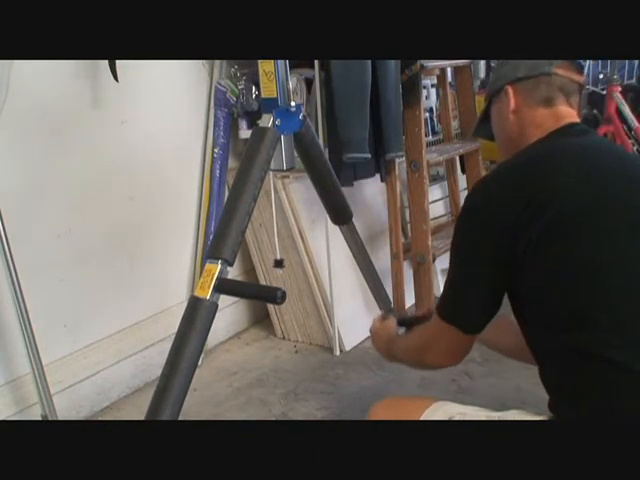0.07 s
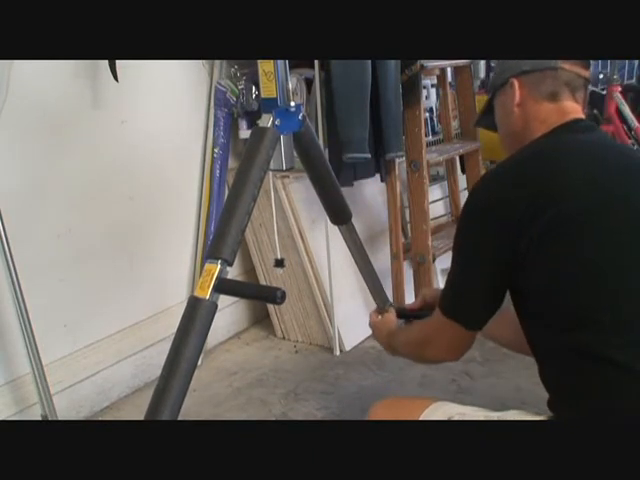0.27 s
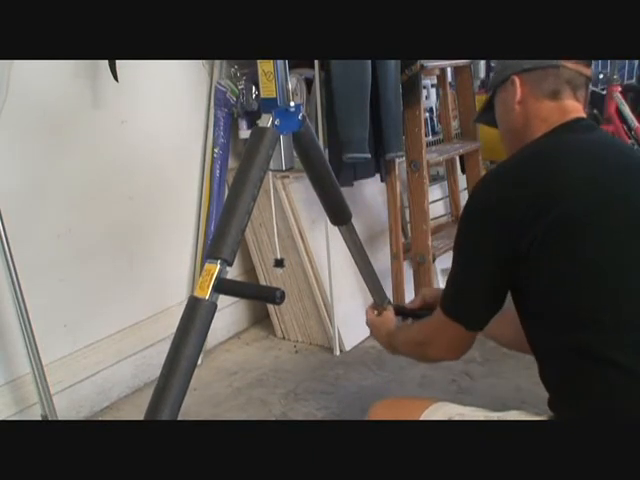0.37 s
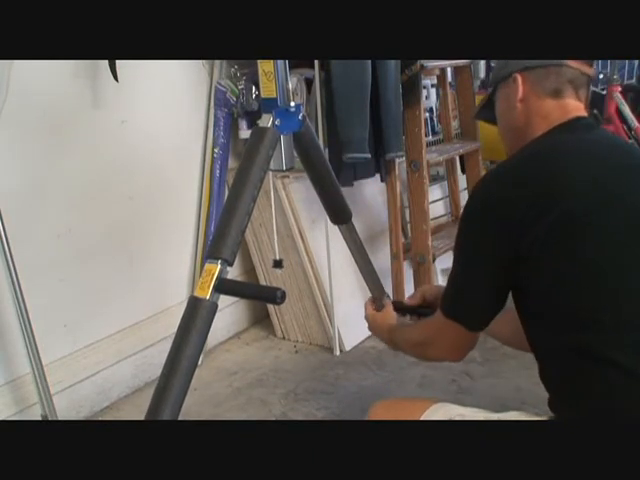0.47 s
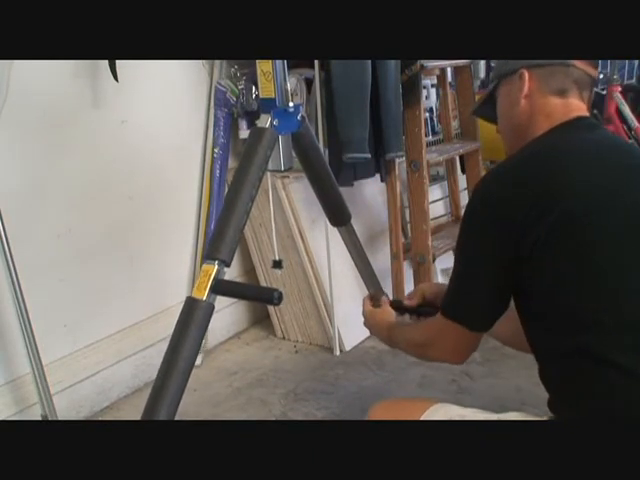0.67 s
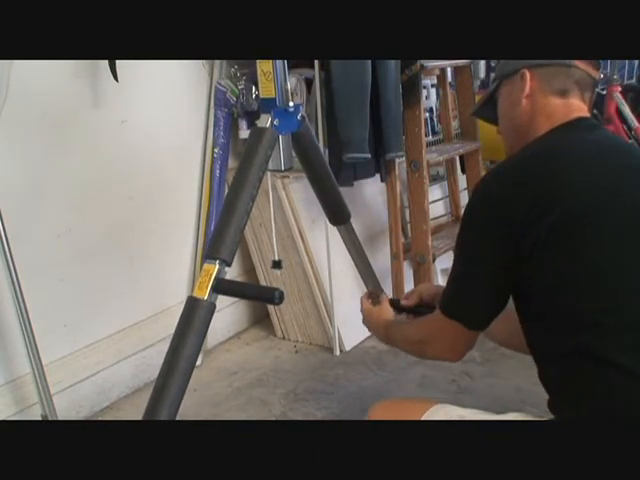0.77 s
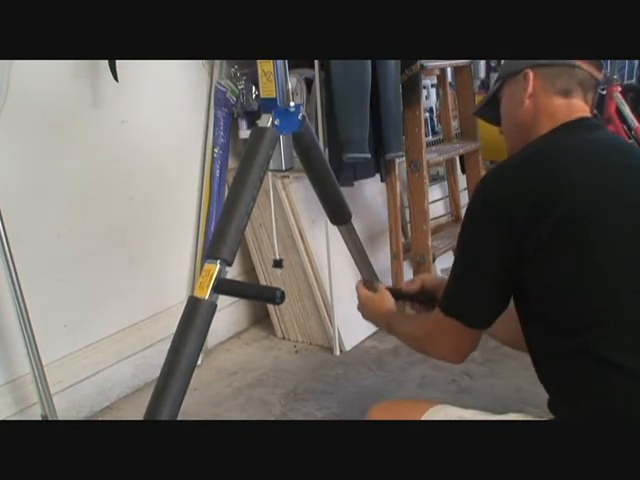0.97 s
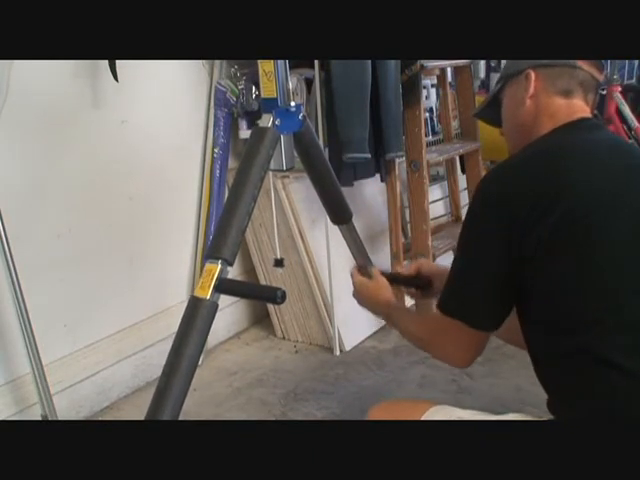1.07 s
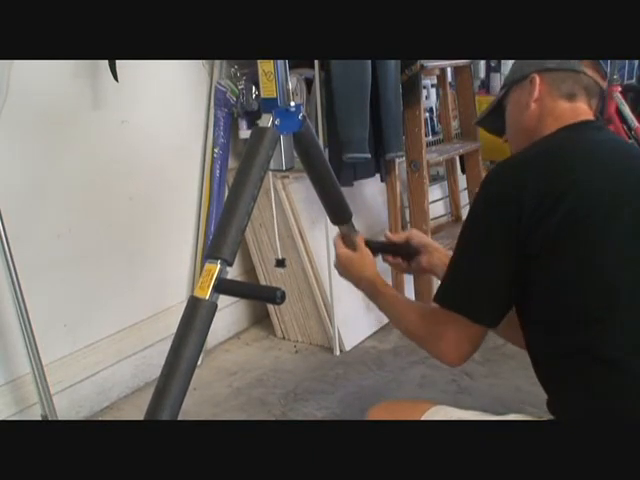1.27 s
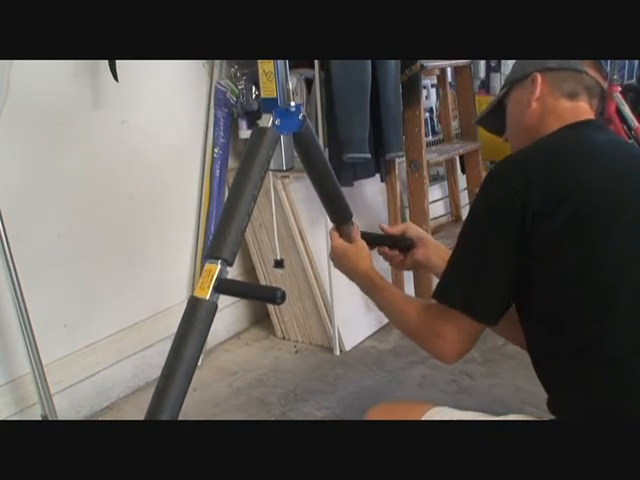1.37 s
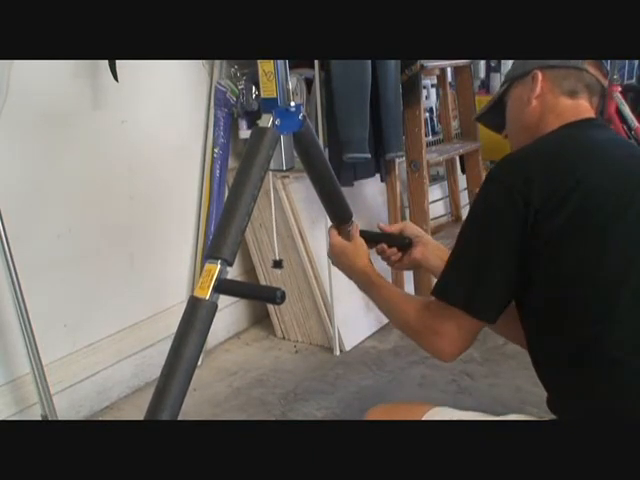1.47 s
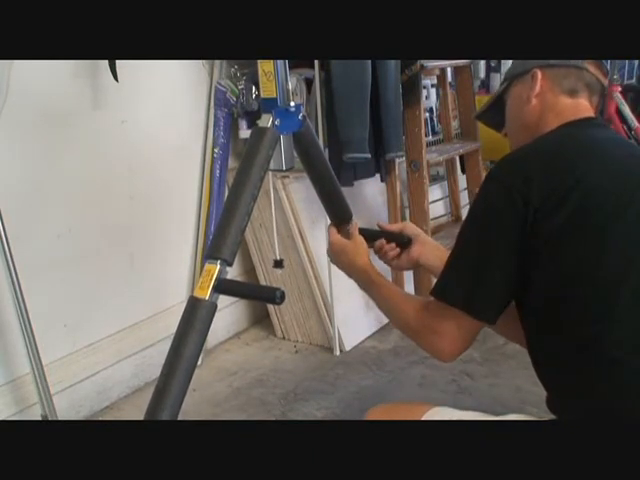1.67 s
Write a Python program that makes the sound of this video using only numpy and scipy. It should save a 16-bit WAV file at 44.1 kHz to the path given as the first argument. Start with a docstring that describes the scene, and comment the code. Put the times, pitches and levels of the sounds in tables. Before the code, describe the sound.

A foam-sleeved metal peg clacks brightly against a hollow tube, then clunks home with a short ring; dry foam rubbing follows in uneven strokes with small squeaks, picked up in stereo in a bare, echoing garage.

```python
"""Under a low garage hum, a foam-sleeved peg clacks against the tube of a metal stand at 0.2 s.
The sleeve begins to rub, catching and slipping; at 0.5 s the peg clunks home, and the strokes go on to 1.6 s.
Knocks are decaying noise through the tube's modes; sine notes ring on, and low ones swell from stand and room.
Rubbing and catches are dense random grains through the same modes; narrow noise makes the squeaks.
Knocks, catches and rubbing are answered by the bare room, built from decaying stereo noise."""
import sys
import numpy as np
from scipy import signal
from scipy.fft import rfft, irfft, next_fast_len
from scipy.io import wavfile
from scipy.ndimage import map_coordinates

SR = 44100
rng = np.random.default_rng(int(sys.argv[2]) if len(sys.argv) > 2 else 0)


def transcribe(signal):
    """Save signal, clipped to [-1, 1], as a 16-bit WAV file at the path in sys.argv[1]."""
    frames = np.atleast_2d(signal).T
    limited = np.clip(frames, -1, 1)
    pcm = np.round(limited * 32767).astype(np.int16)
    wavfile.write(sys.argv[1], SR, pcm)


N = 74970

# Hum and hiss of the garage. Each row: frequency in Hz, relative density in dB per Hz.
FLOOR_SPECTRUM = [(20, -26), (40, -21), (58, 6), (72, -13), (86, -1), (115, -9), (160, -6.5), (260, -21),
                  (500, -23), (1000, -24.5), (2000, -27.5), (4000, -33.5), (8000, -43), (12000, -40),
                  (16000, -41)]
FLOOR_DB, FLOOR_SIDE_DB = -56, -16  # the side is relative to the mid

# Decay of the room's tail. Each row: frequency in Hz, t60 in seconds.
GARAGE_DECAY = [(100, 1), (400, 0.66), (1100, 0.47), (3000, 0.5), (6000, 0.46), (14000, 0.36)]
# Gain of the room's left-right difference. Each row: frequency in Hz, gain in dB.
ROOM_WIDTH = [(100, -16.5), (1000, -10), (4000, -10), (8000, -8.5), (10500, -1.5), (12500, -36)]
ROOM_DB, EARLY_DB, EARLY_T60_S, ROOM_BUILD_S = -1, -3, 0.079, 0.0059
# Direct sound on the same scale as the two room levels.
KNOCK_DIRECT_DB, CATCH_DIRECT_DB, SQUEAK_DIRECT_DB, RUB_DIRECT_DB = -2, -7, 6, -3.5

# Modes of the metal tube. Each row: frequency in Hz, width in Hz, relative level in dB.
TUBE_MODES = [(348, 38, -10), (563.3, 10, 10.5), (1060, 200, -4.5), (1806, 175, 3), (2277, 53, 4),
              (3235, 98, 6.5), (3414, 74, 9), (4016, 76, 6.5), (4935, 36, 8.5), (5080, 180, 0),
              (5200, 32, -2), (5870, 14, -2), (6100, 68, -13), (7530, 190, 3.5)]
# Low notes of the stand and the room. Each row: start in seconds, level in dB, frequency in Hz,
# t60 in seconds.
LOW_NOTES = [(0.22, -39, 361, 0.4), (0.512, -28.5, 437.5, 0.5), (0.58, -44.5, 81.2, 0.86),
             (0.53, -40, 265.5, 0.92), (0.59, -38.5, 201.2, 0.34), (0.809, -42, 206, 0.7)]
# Long notes of the metal. Each row: frequency in Hz, level after the clack in dB,
# level after the clunk in dB, t60 in seconds.
RINGING_NOTES = [(1126, -40, -64, 0.22), (1330, -65, -28, 0.16), (1441, -59, -27.5, 0.19),
                 (2250, -32, -60, .33), (4868, -33.5, -66, 0.46), (5670, -64, -39.5, 0.6),
                 (5810, -61, -31, 0.22)]

CLACK_S, CLUNK_S = 0.2121, 0.5
# First hard touch of the clack. Each row: level in dB, frequency in Hz, rise in seconds, t60 in seconds.
TOCK_PARTIALS = [(-6, 1850, .0008, .010), (-13, 1250, .0008, .012), (-15, 2650, .0008, .014)]
# The two blows of the peg. Each holds: relative level in dB, contact t60 in seconds,
# rattle level against the contact in dB, rattle t60 in seconds, tube ring in dB.
CLACK_BLOW = (-5.5, 0.2, -26, 1, 0)
CLUNK_BLOW = (-5.5, 0.05, -23, 0.1, -21)
# Colour of each contact. Each row: frequency in Hz, relative level in dB per Hz.
CLACK_SPECTRUM = [(100, -23), (260, -10.5), (370, 1.5), (600, -7.5), (720, -8.5), (1050, 3.5), (1400, -7.5),
                  (2200, -0.5), (3200, -12), (4000, -19), (5200, -9), (7500, -20), (8800, -25.5),
                  (12500, -23), (16000, -25)]
CLUNK_SPECTRUM = [(100, -12.5), (250, -3.5), (440, 1.5), (650, -7), (1000, 1.5), (1350, -1.5), (1800, -7),
                  (2700, -15.5), (4600, -19.5), (5900, -12.5), (8000, -19.5), (10000, -31), (12000, -24.5),
                  (16000, -40)]

# The sleeve catches and slips. Each row: start in seconds, relative level in dB, squeak in Hz,
# squeak level in dB, bass tilt in dB, treble tilt in dB, time scale of the catch in seconds.
SLEEVE_CATCHES = [(0.366, -19.5, 1790, -12, -12, -28, 0.033), (0.636, -18.5, 3250, -2.5, 1, -9.5, 0.011),
                  (0.778, -22.5, 1470, -0.5, 13, -2, 0.021), (0.799, -13.5, 1800, -5.5, 7, -6, 0.015),
                  (0.9345, -11.5, 3200, -4, -4, 0.5, 0.0072), (0.941, -16.5, 8120, -4.5, 3, 13, 0.0082),
                  (1.0117, -9.5, 3380, -4, -2, -3, 0.015), (1.078, -14, 2750, -4.5, -3, -8, 0.0097),
                  (1.183, -22.5, 1760, -16, -22, -11, .008), (1.204, -13.5, 1940, -0.5, -21, -4.5, 0.0098),
                  (1.366, -22, 1130, 4, -5.5, 6.5, 0.0055), (1.427, -21, 1690, -25, 18, -7, 0.0096)]
# Colour of the catch scrapes. Each row: frequency in Hz, gain in dB.
SCRAPE_SPECTRUM = [(150, -19), (400, -13), (700, -4), (1100, -4), (2200, -0.5), (2900, -5.5), (4400, -5.5),
                   (6200, -3), (8500, -13), (10500, -15.5), (12500, -17), (16000, -40)]
SQUEAK_WIDTH_HZ = 410  # of each of two equal resonances in a row

# Rubbing effort over time. Each row: time in seconds, level in dB.
RUB_EFFORT = [(0.3, -64), (0.37, -43.5), (0.45, -41), (0.5, -44.5), (0.58, -38), (0.66, -46.5), (0.72, -76),
              (0.77, -47), (0.81, -34.5), (0.86, -50.5), (0.925, -64), (0.96, -40.5), (1.06, -42.5),
              (1.1, -34), (1.18, -39), (1.26, -34.5), (1.34, -39), (1.44, -36), (1.52, -46), (1.6, -58.5),
              (1.7, -58)]
# Movement of the rubbing's hiss against its body. Each row: time in seconds, offset in dB.
HISS_MOVEMENT = [(0.36, -4), (0.44, 3.5), (0.6, 0.5), (0.8, 1.5), (0.97, 1.5), (1.12, 4.5), (1.28, 3),
                 (1.45, -2), (1.62, -5)]
HISS_DB = -4  # added to the movement
# Colour of the rubbing's body and of its hiss. Each row: frequency in Hz, gain in dB.
BODY_SPECTRUM = [(80, -25.5), (200, -3), (380, 1), (680, -8), (1100, 4), (1500, -4), (1900, -4.5),
                 (2700, -14.5), (4500, -22.5), (16000, -36)]
HISS_SPECTRUM = [(800, -55), (2300, -16.5), (3300, -1.5), (4300, -5.5), (5300, -0.5), (7000, -7.5),
                 (10000, -10), (12500, -10.5), (16000, -20)]
GRAINS_PER_S, GRAIN_SPREAD_DB = 2000, 4.5

# Left level over right level. Each row: frequency in Hz, difference in dB.
STEREO_BALANCE = [(60, -2), (250, -2.3), (500, 0), (1000, 1), (8000, 1), (12000, 0)]
TOP_HZ = 15780


def amp(db):
    """Decibels to gain."""
    return 10 ** (np.asarray(db) / 20)


def unit(x):
    """x at rms 1."""
    return x / np.sqrt(np.mean(x ** 2) + 1e-20)


def burst(x):
    """x with the energy of a hundredth of a second at rms 1."""
    return x / np.sqrt(np.sum(x ** 2) / (SR / 100) + 1e-20)


def along(points, hz):
    """Interpolate (Hz, value) points on a log frequency axis."""
    f, v = np.transpose(points)
    return np.interp(np.log(hz + 1), np.log(f + 1), v)


def curve(points):
    """Interpolate (seconds, value) points, one value per sample."""
    return np.interp(np.arange(N) / SR, *np.transpose(points))


def since(s):
    """Seconds since s, zero before."""
    return np.maximum(np.arange(N) / SR - s, 0)


def filtered(x, response):
    """x shaped by a complex response of frequency."""
    m = 2 * next_fast_len(N)
    spectrum = rfft(x, m) * response(np.fft.rfftfreq(m, 1 / SR))
    return irfft(spectrum, m)[..., :N]


def colour(points, hz):
    """Causal (minimum-phase) response with the gain of (Hz, dB) points."""
    cepstrum = irfft(np.log(amp(along(points, hz))))
    half = len(cepstrum) // 2
    cepstrum[1:half] *= 2
    cepstrum[half + 1:] = 0
    return np.exp(rfft(cepstrum))


def resonance(f, centre, width):
    """Causal response of one mode, 1 at its centre."""
    return 1j * f * width / (centre ** 2 - f * f + 1j * f * width)


def room_tone():
    """Low hum and faint hiss: steady noise shaped by the floor spectrum, mostly in the middle."""
    noise = rng.standard_normal((2, N))
    mid, side = unit(filtered(noise, lambda f: amp(along(FLOOR_SPECTRUM, f))))
    return amp(FLOOR_DB) * (mid + amp(FLOOR_SIDE_DB) * np.array([side, -side]))


def garage(x, direct_db):
    """Direct sound, sparse echoes of near walls and a long tail, as left and right."""
    n = SR * 3 // 4
    # The tail is noise whose frequencies die at their own rates.
    hz, t, z = signal.stft(rng.standard_normal((2, n)), SR, nperseg=256)
    decay = amp(-60 * t / along(GARAGE_DECAY, hz)[:, None])
    tail = signal.istft(z * decay, SR, nperseg=256)[1][:, :n]
    t = np.arange(n) / SR
    tail = tail * (1 - np.exp(-t / ROOM_BUILD_S))
    reflections = rng.standard_normal((2, n)) * (rng.random((2, n)) < .03)
    early = reflections * amp(-60 * t / EARLY_T60_S)
    echo = amp(ROOM_DB) * tail / np.linalg.norm(tail[0])
    echo = echo + amp(EARLY_DB) * early / np.linalg.norm(early[0])
    mid, side = signal.fftconvolve(x[None], echo, axes=1)[:, :N]
    mid = mid + amp(direct_db) * x
    side = filtered(side, lambda f: amp(along(ROOM_WIDTH, f)))
    total = np.sqrt(amp(direct_db) ** 2 + amp(ROOM_DB) ** 2 + amp(EARLY_DB) ** 2)
    return np.array([mid + side, mid - side]) / total


def low_notes():
    """Low notes of the stand and the room, sines that swell and die after the knocks."""
    out = np.zeros(N)
    for s, db, hz, t60 in LOW_NOTES:
        t = since(s)
        swell = 1 - np.exp(-t / 0.0049)
        out += amp(db - 60 * t / t60) * swell * np.sin(2 * np.pi * hz * t)
    return out


def singing():
    """Both knocks leave the metal ringing, each note a little unsteady in phase."""
    out = np.zeros(N)
    for hz, clack_db, clunk_db, t60 in RINGING_NOTES:
        for s, db in (CLACK_S, clack_db), (CLUNK_S, clunk_db):
            t = since(s)
            drift = map_coordinates(rng.standard_normal(200), [t * 50])  # 50 random points a second
            swell = 1 - np.exp(-t / 0.0072)
            out += amp(db - 60 * t / t60) * swell * np.sin(2 * np.pi * hz * t + .5 * drift)
    return out


def tube(f, ring_db):
    """Response of a contact on the tube: the contact itself plus the modes it rings."""
    modes = sum(amp(db) * resonance(f, hz, width) for hz, width, db in TUBE_MODES)
    return 1 + amp(ring_db) * modes


def tock():
    """The clack opens with a few hard cycles that reach the microphones without the room."""
    t = since(CLACK_S)
    out = np.zeros(N)
    for db, hz, rise, t60 in TOCK_PARTIALS:
        attack = 1 - np.exp(-(t / rise) ** 2)
        out += amp(db - 60 * t / t60) * attack * np.sin(2 * np.pi * hz * t)
    return out


def knock(s, blow, spectrum):
    """A hard contact and a weaker rattle with it, both decaying noise, ring the tube."""
    db, contact_t60, rattle_db, rattle_t60, ring_db = blow
    t = since(s)
    envelope = amp(-60 * t / contact_t60) + amp(rattle_db - 60 * t / rattle_t60)
    force = (t > 0) * rng.standard_normal(N) * envelope
    struck = filtered(force, lambda f: colour(spectrum, f) * tube(f, ring_db))
    return amp(db - 13.5) * garage(burst(struck), KNOCK_DIRECT_DB)


def grit():
    """Dense tiny slips of uneven size, at random moments and of either sign."""
    size = amp(GRAIN_SPREAD_DB * np.clip(rng.standard_normal(N), -2, 2))
    slips = rng.random(N) < GRAINS_PER_S / SR
    return unit(slips * size * rng.standard_normal(N))


def catches():
    """Each catch lets go in a short scrape; a rough squeak swells in it and stops."""
    scrapes, squeaks = np.zeros((2, 2, N))
    for s, db, squeak_hz, squeak_db, bass_db, treble_db, length in SLEEVE_CATCHES:
        u = since(s) / length
        tilt = [(450, bass_db), (1200, 0), (2500, 0), (7000, treble_db)]
        scrape = filtered(np.sqrt(u) * np.exp(-2.5 * u) * grit(),
                          lambda f: colour(SCRAPE_SPECTRUM, f) * amp(along(tilt, f)))
        squeak = filtered(u * np.exp(-2 * u ** 2) * rng.standard_normal(N),
                          lambda f: resonance(f, squeak_hz, SQUEAK_WIDTH_HZ) ** 2)
        scrapes += amp(db - 15.5) * garage(burst(scrape), CATCH_DIRECT_DB)
        squeaks += amp(db + squeak_db - 15) * garage(burst(squeak), SQUEAK_DIRECT_DB)
    # Only the scrapes ring the tube.
    return squeaks + filtered(scrapes, lambda f: tube(f, ring_db=-9))


def rubbing():
    """Foam drags on metal: tiny slips excite the tube, in step with the effort."""
    judder = map_coordinates(rng.standard_normal(200), [np.arange(N) * 60 / SR])  # 60 points a second
    effort = (since(CLACK_S) > 0) * amp(curve(RUB_EFFORT) + 1.4 * judder)
    body = unit(filtered(grit(), lambda f: colour(BODY_SPECTRUM, f) * tube(f, ring_db=-3)))
    hiss = unit(filtered(grit(), lambda f: colour(HISS_SPECTRUM, f) * tube(f, ring_db=-5.5)))
    hiss_gain = amp(HISS_DB + curve(HISS_MOVEMENT))
    return garage(effort * (body + hiss_gain * hiss), RUB_DIRECT_DB)


def scene():
    """The two knocks, the ringing notes, the sliding sleeve and the room."""
    clack = tock() + knock(CLACK_S, CLACK_BLOW, CLACK_SPECTRUM)
    clunk = knock(CLUNK_S, CLUNK_BLOW, CLUNK_SPECTRUM)
    return clack + clunk + singing() + catches() + rubbing() + low_notes() + room_tone()


def record(dry):
    """The two microphones differ slightly in colour; nothing is kept above the band limit."""
    share = np.array([[.5], [-.5]])  # half the balance up on the left, half down on the right
    return filtered(dry, lambda f: amp(along(STEREO_BALANCE, f) * share) * (f < TOP_HZ))


dry = scene()
out = record(dry)
transcribe(out)
```